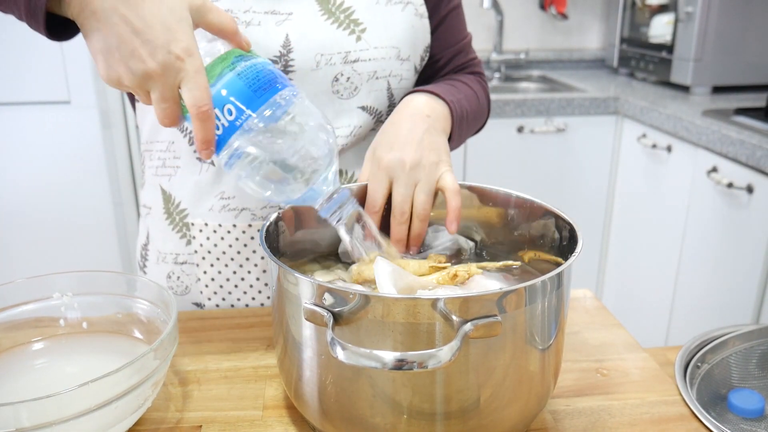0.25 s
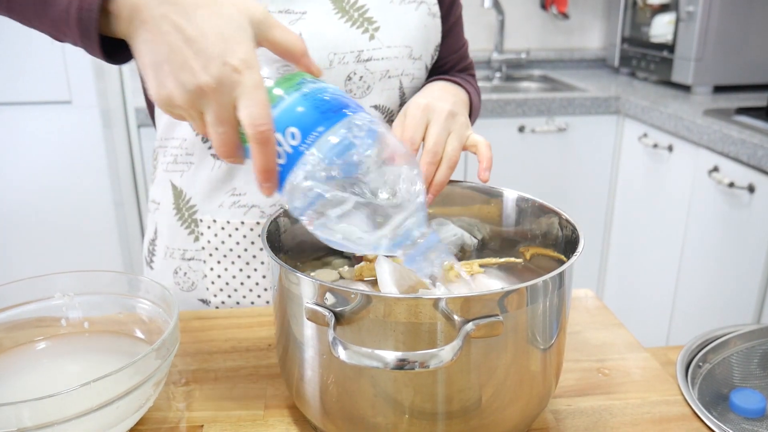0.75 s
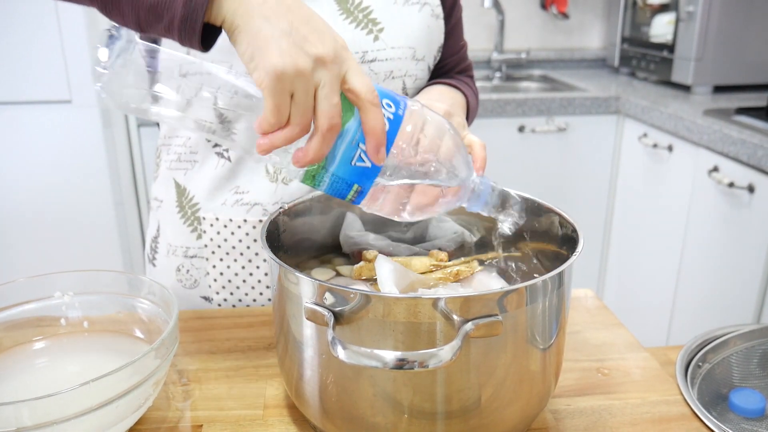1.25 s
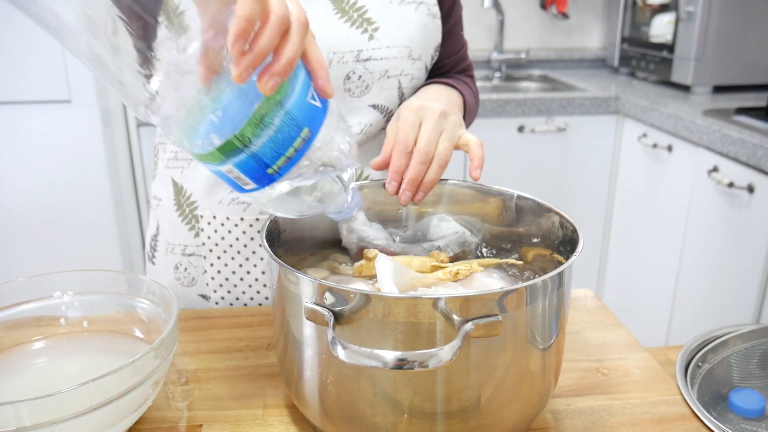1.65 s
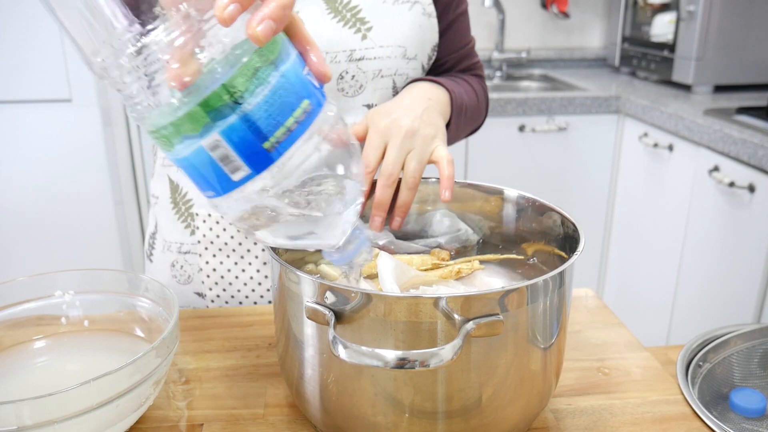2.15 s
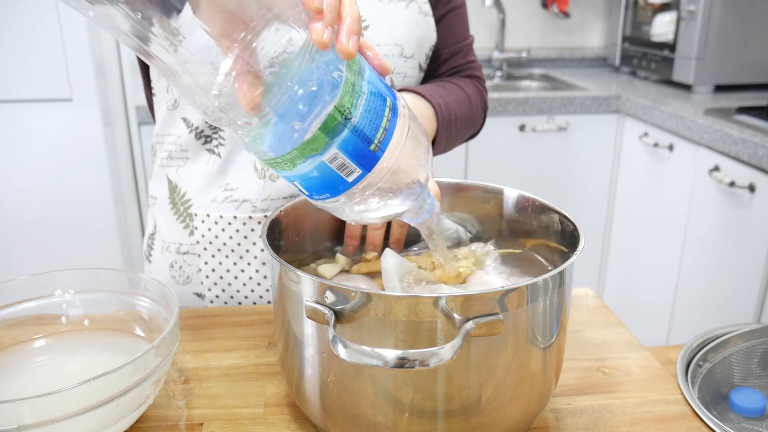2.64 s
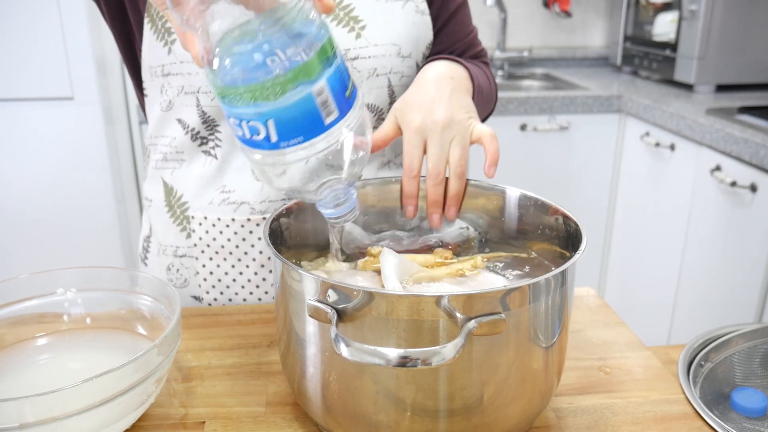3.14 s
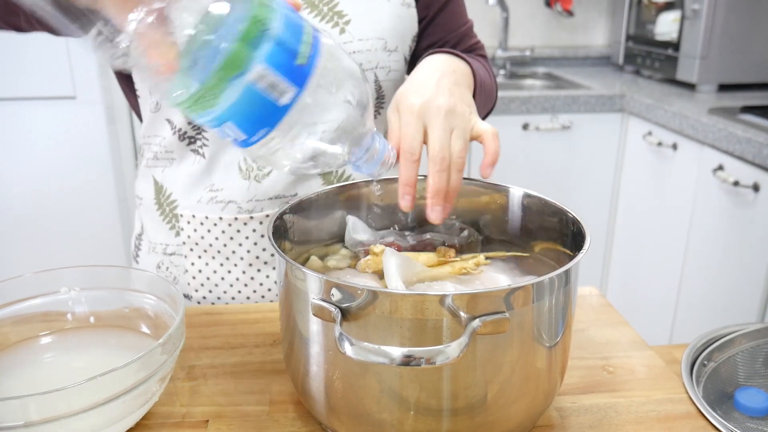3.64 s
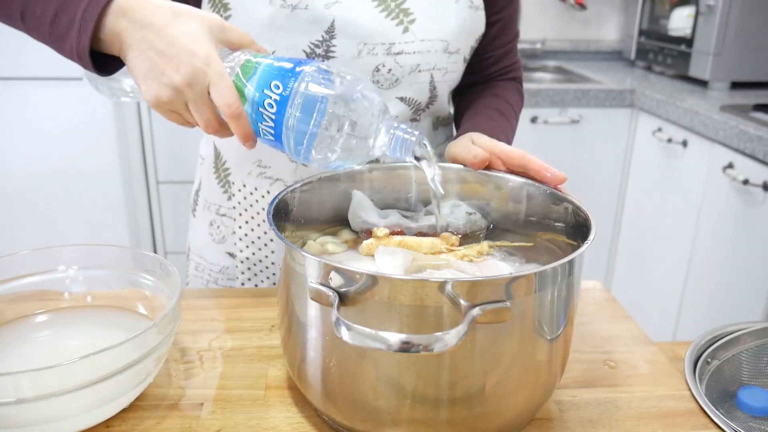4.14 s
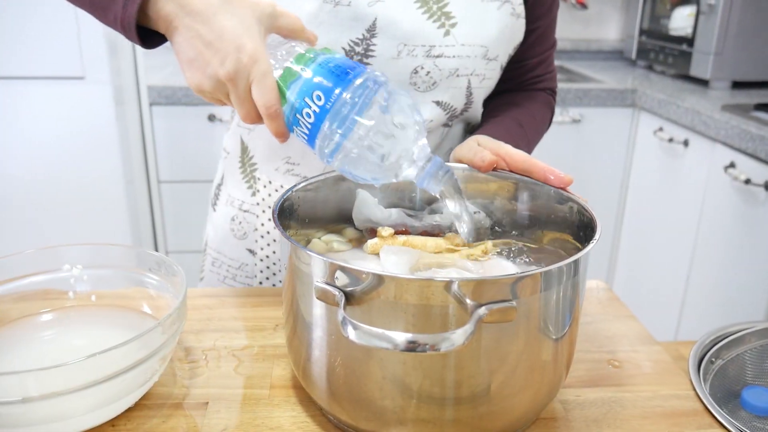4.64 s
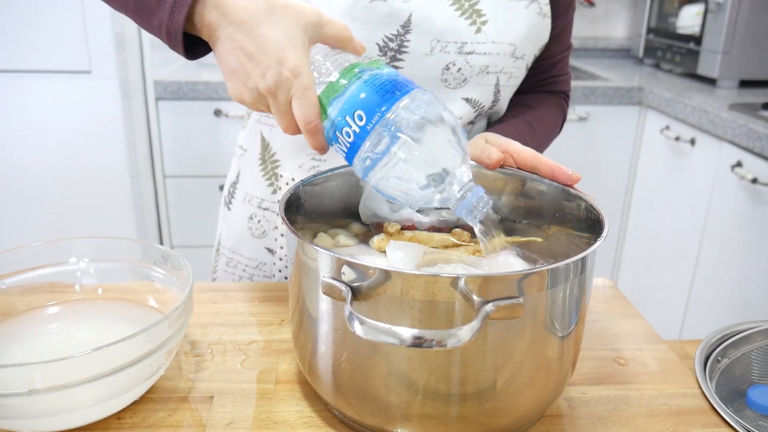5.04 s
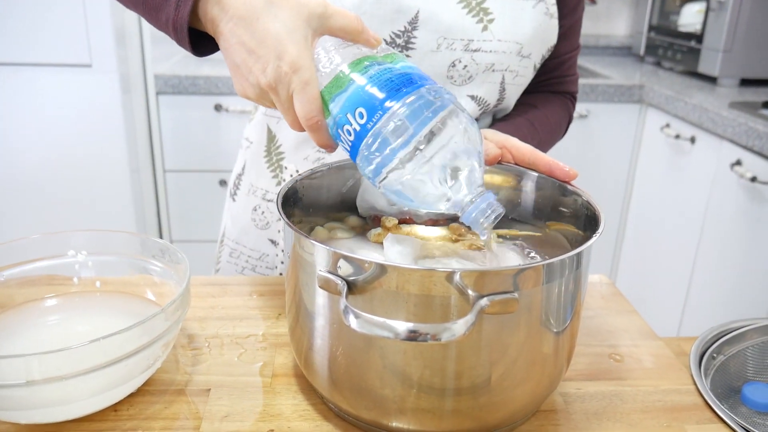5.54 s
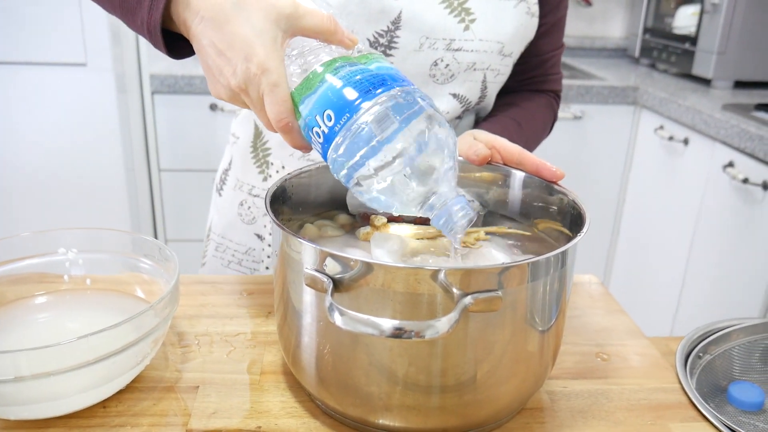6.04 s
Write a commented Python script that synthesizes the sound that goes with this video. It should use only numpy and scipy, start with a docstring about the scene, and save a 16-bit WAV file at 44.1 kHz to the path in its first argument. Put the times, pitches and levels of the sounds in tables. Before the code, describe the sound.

A close, nearly mono pour in a small reflective kitchen over a very quiet low hum. From 0 to 1.1 seconds, a thin uneven trickle spatters onto food in a steel pot, with soft even gulps at about 0.26, 0.54, 0.78 and 1.03, each singing upward. From 1.25 the glugs deepen, strongest near 1.5, 1.8 and 2.1, with crisp splashes, ticking drops and clear ringing bubbles. At 2.3 the bottle's plastic wall snaps back in a loud, hollow pop. The flow thins into plinks, small slaps and a quick upward chirp near 2.8; a mesh bag squishes brightly at 3.15 and 3.92. Sound vanishes completely from 4.05 to 4.4. A second pour then starts, its glugs drooping in pitch, growing denser and splashier after 5.2, with a hollow slap near 5.76 and bubbling glugs until the end.

```python
"""Water is poured in spurts from a big plastic bottle onto food in a steel pot, in a small kitchen.
Soft, even gulps open the pour, each with a rising note; stronger glugs follow as air enters the neck.
The stream spatters and traps ringing bubbles; near 2.3 s the bottle's wall pops back loudly, and
a mesh bag squishes near 3.15 and 3.92 s. After a brief mute near 4.2 s a second pour glugs and splashes,
with one hollow slap near 5.76 s. Tones are damped rings, splashes noise, the stream a swarm of rings."""
import sys
import numpy as np
from scipy import signal
from scipy.fft import rfft, irfft, next_fast_len
from scipy.io import wavfile
from scipy.ndimage import uniform_filter1d, map_coordinates

SR = 44100
rng = np.random.default_rng(int(sys.argv[2]) if len(sys.argv) > 2 else 0)


def master_out(mix):
    """Clip the mix to full scale and print it as 16-bit PCM to the path in sys.argv[1]."""
    frames = np.transpose(np.atleast_2d(mix))
    ceiling = np.clip(frames, -1, 1)
    pcm = np.round(ceiling * 32767).astype(np.int16)
    wavfile.write(sys.argv[1], SR, pcm)


N = 277462

# Spectrum of the kitchen background. Each row: frequency in Hz, relative density in dB.
HUM_SPECTRUM = [(12, -46), (20, 8), (60, -12.5), (168, -2), (234, -7.5), (337, -9.5), (367, -10.5),
                (446, -14), (558, -10.5), (607, -13.5), (1000, -15.5), (1400, -20.5), (2460, -35),
                (16000, -38.5)]
HUM_RMS_DB = -55
# Decay of the kitchen's reverberation. Each row: frequency in Hz, t60 in seconds.
ROOM_DECAY = [(80, 0.57), (200, 0.47), (400, 0.56), (1500, 0.37), (5000, .4), (9000, 0.46), (14000, 0.047)]
# Early reflections off pot wall, table and cook. Each row: nominal delay in seconds, linear gain.
EARLY_ECHOES = [(.0021, 0.25), (.0053, 0.087), (.0094, 0.19), (0.0123, 0.19)]
# The kitchen's low modes. Each row: centre in Hz, width in Hz, gain in dB.
ROOM_MODES = [(153, 9.7, 0), (238, 8.3, -3), (376, 86, -4.5)]
# Difference signal of the two microphone ports. Each row: frequency in Hz, side level in dB.
STEREO_SIDE = [(30, -18.5), (120, -35.5), (1000, -28.5), (2500, -27.5), (5000, -18), (12000, -15)]
# The muted moment between two pours: start in seconds, end in seconds.
MUTE_SPAN = (4.046, 4.408)
CEILING, TOP_HZ = 1.0, 16000  # soft clipping limit at full scale; upper band edge
LOW_CUT_HZ = 77  # the narrow neck radiates little below this

# Thin stream between the spurts. Each row: time in seconds, relative level in dB.
TRICKLE = [(0.0, -55.5), (1.15, -58.5), (1.45, -51), (1.76, -62.5), (2.5, -59.5), (3.0, -58.5), (3.5, -62),
           (3.8, -72), (4.5, -60.5), (4.95, -61), (5.3, -51.5), (5.62, -58), (6.1, -53.5)]
TRICKLE_SPRAY_DB = -4.5  # spray against bubbling
DRIBBLE_DB, DRIBBLE_KNOTS_PER_S = 4, 35  # the thin stream comes in uneven dribbles
# Spurts of water landing in the pot, and the hiss of a squeezed mesh bag near 3.15 and 3.92 s.
# Each row: start in seconds, relative bubbling level in dB, length in seconds, spray over bubbling in dB.
SPURTS_AND_SQUISHES = [(0.0, -50.5, 0.088, 4), (0.331, -53.5, 0.042, 3), (0.417, -53.5, 0.043, 2.5),
                       (0.606, -43.5, 0.023, -7.5), (0.655, -56.5, 0.027, 11.5), (0.84, -49, .06, -2),
                       (0.923, -40.5, 0.031, -7), (1.186, -39.5, 0.0244, -3.5), (1.258, -39.5, .015, -12.5),
                       (1.482, -25.5, 0.0083, -12), (1.551, -34.5, 0.017, -4.5),
                       (1.807, -48.5, 0.0056, 10.5), (1.867, -41, 0.01, -4.5), (1.953, -41, 0.022, -11.5),
                       (2.11, -49, 0.39, -3.5), (2.442, -42, 0.014, -4), (2.628, -46.5, 0.043, -3.5),
                       (2.734, -44.5, 0.067, -1.5), (2.814, -40, 0.0089, -1), (3.067, -57, 0.012, 5),
                       (3.154, -54.5, 0.02, 8.5), (3.268, -44.5, 0.025, -23), (3.913, -43.5, 0.021, -7.5),
                       (4.521, -53, .07, 4.5), (4.765, -49.5, 0.012, 0.5), (5.025, -40.5, 0.0093, -7),
                       (5.133, -47, 0.0092, -4), (5.242, -38.5, 0.019, -9.5), (5.348, -34.5, 0.017, -4),
                       (5.43, -46, 0.0253, -6), (5.524, -42, 0.0074, -13.5), (5.695, -46, 0.15, -8),
                       (5.758, -38, 0.016, 1), (5.804, -35.5, 0.012, -24.5), (5.956, -44.5, 0.016, -12.5),
                       (6.155, -37.5, 0.018, -14.5), (6.211, -41, 0.026, -8.5), (6.269, -35, 0.017, -20)]
SPURT_ATTACK_S, SPURT_FALL_DB_PER_S = 0.0033, 212
# Colour of the bubbling. Each row: frequency in Hz, gain in dB.
GURGLE_COLOUR = [(500, -24.5), (800, -11), (1200, -3.5), (2500, 1), (3600, 0), (5000, -4.5), (8000, -26)]
# Colour of the spray and of each tick's crack. Each row: frequency in Hz, gain in dB.
SPRAY_COLOUR = [(1500, -5), (3000, -8), (5000, -1), (8000, 3.5), (10700, -6.5), (12800, 0.5),
                (15500, -10.5)]
BUBBLING_DB, SPRAY_DB = -2.5, 0  # layer gains
PLINK_DB, MIST_DB = -4.5, -3.5  # clear single bubbles against the bubbling; mist against the crackle
CLUMP_DB = 5  # lumpiness of the stream

# Sharp drops ticking on food and steel, and two bright squishes of a mesh bag near 3.15 and 3.92 s.
# Each row: start in seconds, relative level in dB, pitch in Hz.
TICKS_AND_SQUISHES = [(0.036, -42, 6300), (.249, -30, 8750), (0.3389, -27, 7300), (0.445, -31, 8550),
                      (1.035, -28.5, 5900), (1.4746, -19, 6500), (1.499, -19, 3830), (1.561, -17.5, 7840),
                      (1.8158, -21, 8160), (2.4635, -26.5, 7600), (2.7356, -30.5, 4700),
                      (2.8268, -28, 7600), (2.9585, -31, 7600), (3.0784, -33, 10300), (3.153, -20, 12100),
                      (3.5496, -35, 6180), (3.923, -23.5, 13700), (4.5863, -27.5, 5300),
                      (5.3779, -20, 7800), (5.5003, -23.5, 5470), (5.774, -29, 7300), (5.824, -21.5, 9800)]
TICK_CYCLES = 26  # cycles of ringing per t60
# Lumps of water slapping down. Each row: start in seconds, relative level in dB, t60 in seconds.
SLAPS = [(.022, -25.5, 0.016), (0.447, -27.5, .016), (1.196, -30, 0.19), (1.499, -27.5, .02),
         (1.527, -37.5, .022), (2.818, -37, 0.01), (3.274, -37.5, .008), (3.46, -26.5, 0.022),
         (4.412, -34, 0.148), (5.244, -34.5, 0.0293), (5.368, -27, 0.077), (5.689, -21, 0.023),
         (5.763, -23, 0.17), (5.773, -21, .11), (6.16, -17, 0.011), (6.269, -28, 0.027)]
# Colour of the slaps. Each row: frequency in Hz, gain in dB.
SLAP_COLOUR = [(100, -12), (400, -4.5), (800, 8), (2500, -6.5), (5000, -14), (9000, -20.5), (16000, -25.5)]
# Air pockets closing as they surface.
# Each row: start in seconds, level in dB, first pitch in Hz, last pitch in Hz, length in seconds.
CHIRPS = [(2.778, -23.5, 2845, 4180, 0.012), (5.121, -39.5, 964, 2120, 0.037),
          (5.338, -25.5, 1420, 2460, .018), (5.954, -31.5, 1800, 2730, 0.017)]
CHIRP_BEND = 1.5  # the climb speeds up toward the end
# The largest bubbles. Each row: start in seconds, relative level in dB, pitch in Hz, t60 in seconds.
BUBBLES = [(0.3516, -26.5, 3580, 0.016), (0.4457, -24, 2130, 0.0041), (0.6973, -30, 3100, 0.018),
           (0.937, -32, 1140, 0.025), (0.9506, -23, 2680, 0.017), (1.221, -32, 744, 0.12),
           (1.4054, -33.5, 976, 0.028), (1.4467, -15.5, 2356, 0.02), (1.5774, -27.5, 1130, 0.046),
           (1.7053, -27, 1496, .036), (1.9759, -26, 1720, 0.012), (2.014, -33, 2536, .021),
           (2.762, -31, 1600, 0.049), (2.818, -28, 1350, 0.016), (2.88, -37, 1740, 0.02),
           (3.123, -35, 2700, 0.016), (3.197, -29, 2530, 0.011), (3.367, -26, 2020, 0.0063),
           (3.5152, -40.5, 2840, .024), (4.586, -24.5, 2510, 0.0078), (5.255, -27.5, 2600, 0.048),
           (5.525, -27, 2150, 0.019), (5.726, -16.5, 1340, 0.0045), (5.7848, -21.5, 2484, 0.032),
           (5.984, -24, 1141, 0.43), (6.057, -28, 1650, .07), (6.222, -24.5, 2210, 0.012),
           (6.2694, -29.5, 810, 0.059)]
BUBBLE_RISE, BUBBLE_LIFE_S = 0.12, 0.013  # climb in pitch per t60, as a share; time until it bursts

# The plastic wall popping. Each row: start in seconds, relative level in dB, t60 in seconds.
POPS = [(2.2892, 2, 0.029)]
# Resonances of the bottle and its water. Each row: centre in Hz, width in Hz, gain in dB.
WALL_MODES = [(131.1, 110, -3.5), (350, 120, 4), (695, 420, -4), (1100, 197, 4), (1660, 700, -8.5),
              (2700, 790, -11.5), (5400, 1800, -24.5), (13000, 2700, -38)]
# Soft, even gulps as the pour begins. Each row: start in seconds, relative level in dB.
GULPS = [(0.2608, -27.5), (0.5354, -25.5), (0.7768, -27), (1.034, -30)]
GULP_HZ, GULP_UPPER_DB = 305, -16  # pitch; relative level of the upper resonance
NOTE_HZ, NOTE_T60_S, NOTE_RISE, NOTE_DB = 264.6, 0.14, 1.2, -3  # rising note after each soft gulp
NOTE_DELAY_S, NOTE_ATTACK_S = 0.004, 0.006
# Air gulping in at the neck, and one hollow slap of water near 5.76 s.
# Each row: start in seconds, relative level in dB, pitch in Hz, glide as a share of the pitch,
# upper resonance in relative dB.
GLUGS_AND_HOLLOW_SLAP = [(1.2609, -26.5, 165.6, 0.5, -12), (1.347, -26, 232, 0.3, -25),
                         (1.4017, -27.5, 232, 0.2, -35), (1.5036, -11, 247, -0.14, -6),
                         (1.675, -27.5, 228, -0.2, -33), (1.8128, -9.5, 434, -.1, -6),
                         (1.981, -26, 206, 0, -32), (2.1138, -7, 428, 0.26, -6.5),
                         (2.389, -24.5, 156, -0.06, -37), (4.4137, -23, 340, -0.5, -26),
                         (4.6595, -25.5, 333, -0.63, -6.5), (4.9933, -25.5, 333, -0.9, -4.5),
                         (5.224, -31, 328, -0.5, -3), (5.2457, -26, 350, -1.2, 4),
                         (5.3653, -23.5, 323, -.4, -38), (5.6643, -25, 341, -0.54, -13),
                         (5.6903, -23.5, 345, -0.8, -18), (5.763, -17, 680, 0.2, 2.5),
                         (5.8499, -29, 320, -1, -1), (6.1346, -20.5, 370, -0.75, -5)]


def amp(db):
    """Logarithmic level: decibels to amplitude gain."""
    return 10 ** (np.asarray(db) / 20)


def unit(x):
    """Normalisation of power: scale to rms 1."""
    return x / np.sqrt(np.mean(x ** 2) + 1e-20)


def levelled(x, span_s):
    """Short-time power normalisation: hold the rms near 1 over stretches of span_s."""
    power = np.abs(uniform_filter1d(x ** 2, int(span_s * SR)))
    return x / np.sqrt(power + 1e-12)


def along(points, hz):
    """Interpolation of (Hz, value) points on a logarithmic frequency axis."""
    f, v = np.transpose(points)
    return np.interp(np.log(hz + 1), np.log(f), v)


def filtered(x, response):
    """Linear filtering: multiply the spectrum by a function of frequency."""
    n = x.shape[-1]
    m = next_fast_len(n + SR // 4)
    return irfft(rfft(x, m) * response(np.fft.rfftfreq(m, 1 / SR)), m)[..., :n]


def coloured(x, points, size=2048):
    """Minimum-phase filtering: fold the cepstrum of (Hz, dB) gains into a causal response."""
    cepstrum = irfft(np.log(amp(along(points, np.fft.rfftfreq(size, 1 / SR)))))
    cepstrum[1:size // 2] *= 2
    cepstrum[size // 2 + 1:] = 0
    impulse = irfft(np.exp(rfft(cepstrum)))
    return signal.fftconvolve(x, impulse)[:len(x)]


def resonant(x, modes):
    """Modal superposition: parallel damped resonators with alternating signs."""
    def response(f):
        total = 0
        for k, (centre, width, db) in enumerate(modes):
            mode = 1j * f * width / (centre * centre - f * f + 1j * f * width)
            total = total + (-1) ** k * amp(db) * mode
        return total
    return filtered(x, response)


def add(track, s, sound):
    """Superposition: mix a sound into the track at time s."""
    part = track[max(round(s * SR), 0):][:len(sound)]
    part += sound[:len(part)]


def wobble(rate):
    """Smooth random modulation: a spline through rate random knots a second."""
    knots = rng.standard_normal(int(N * rate / SR) + 4)
    return map_coordinates(knots, [np.arange(N) * rate / SR])


def ring(hz, t60, rise, attack):
    """Damped oscillation: a decaying tone whose pitch changes by the share rise in one t60."""
    t = np.arange(int(t60 * SR) + 2) / SR
    tone = np.sin(2 * np.pi * hz * t * (1 + rise * t / t60 / 2))
    return tone * amp(-60 * t / t60) * (1 - np.exp(-t / attack))


def burst(t60):
    """Exponential decay of noise: a puff of white noise dying away."""
    t = np.arange(SR // 4) / SR
    return rng.standard_normal(len(t)) * amp(-60 * t / t60)


def swarm(count, low_hz, high_hz, cycles, rise, spread_db):
    """Random superposition: many bubbles or drops of random time, pitch, life and size."""
    track = np.zeros(N)
    for when, pitch, life, size in rng.random((count, 4)):
        hz = low_hz * (high_hz / low_hz) ** pitch
        t60 = cycles * 2 ** (2 * life - 1) / hz  # half to double the given cycles
        tone = ring(hz, t60, rise, 0.5 / hz)
        add(track, when * N / SR, amp(spread_db * size ** 2) * tone)
    return track


def hum():
    """Stationary noise: the kitchen background is white noise shaped to a steady spectrum."""
    return amp(HUM_RMS_DB) * unit(coloured(rng.standard_normal(N), HUM_SPECTRUM, size=16384))


def kitchen(x, wet_db):
    """Reverberation: close hard surfaces answer first, then noise decays at each frequency's own rate."""
    hz, t, z = signal.stft(rng.standard_normal(SR // 2), SR, nperseg=256)
    decay = amp(-60 * t / along(ROOM_DECAY, hz)[:, None])
    tail = signal.istft(z * decay, SR, nperseg=256)[1]
    tail *= 1 - np.exp(-np.arange(len(tail)) / SR / 0.00067)
    answer = amp(wet_db) * tail / np.linalg.norm(tail)
    for delay, gain in EARLY_ECHOES:
        add(answer, delay * np.exp(rng.normal(0, 0.16)), np.array([gain]))
    return x + signal.fftconvolve(x, answer)[:len(x)]


def moving(x, wet_db, count=18):
    """Time-varying reflection: the stream wanders over the pot, so each stretch has fresh echoes."""
    track = np.zeros(N)
    for part in np.array_split(np.arange(N), count):
        padded = np.pad(x[part], (0, SR // 2))  # room for the tail
        add(track, part[0] / SR, kitchen(padded, wet_db))
    return track


def flow():
    """Addition of powers: each spurt or squish swells, holds and fades over a thin, dribbling stream."""
    t = np.arange(N) / SR
    trickle_db = np.interp(t, *np.transpose(TRICKLE))
    bubbling = amp(trickle_db + DRIBBLE_DB * wobble(DRIBBLE_KNOTS_PER_S)) ** 2
    spray = bubbling * amp(TRICKLE_SPRAY_DB) ** 2
    for s, db, length, spray_db in SPURTS_AND_SQUISHES:
        swell = np.clip((t - s) / SPURT_ATTACK_S + 0.5, 0, 1)
        gain = swell * amp(db - SPURT_FALL_DB_PER_S * np.maximum(t - s - length, 0))
        bubbling = bubbling + gain ** 2
        spray = spray + (gain * amp(spray_db)) ** 2
    return np.sqrt(bubbling), np.sqrt(spray)


def stream_and_squishes():
    """Bubble entrainment and spray: foam, clearer plinks and drops, which also lend the bag its hiss."""
    foam = swarm(count=6000, low_hz=600, high_hz=5000, cycles=11, rise=0.1, spread_db=20)
    plinks = swarm(count=230, low_hz=1100, high_hz=5000, cycles=46, rise=0.3, spread_db=12)
    crackle = swarm(count=7000, low_hz=2800, high_hz=15000, cycles=6, rise=0.05, spread_db=30)
    drops = swarm(count=1300, low_hz=3000, high_hz=14000, cycles=50, rise=0.14, spread_db=26)
    mist = amp(MIST_DB) * rng.standard_normal(N)  # droplets too fine to tell apart
    # the stream breaks into blobs before it lands
    clumps = amp(CLUMP_DB * wobble(55) + 2.06 * wobble(300))
    gurgle = levelled(coloured(clumps * foam, GURGLE_COLOUR), 0.045)
    gurgle = gurgle + amp(PLINK_DB) * unit(coloured(plinks, GURGLE_COLOUR))
    droplets = unit(crackle) + amp(1) * unit(drops) + mist
    spray = levelled(coloured(clumps * droplets, SPRAY_COLOUR), 0.06)
    bubbling_gain, spray_gain = flow()
    return amp(BUBBLING_DB) * bubbling_gain * gurgle + amp(SPRAY_DB) * spray_gain * spray


def ticks_and_squishes():
    """Short excitation: a drop, or the squished mesh bag, gives a tiny crack and a very short ping."""
    track = np.zeros(N)
    for s, db, hz in TICKS_AND_SQUISHES:
        add(track, s, amp(db + 5.5) * ring(hz, TICK_CYCLES / hz, 0.17, 0.0001))
        add(track, s, amp(db - 7) * coloured(burst(0.0118), SPRAY_COLOUR))
    return track


def slaps():
    """Broadband impact: a lump of water breaks on the food in a splash of decaying noise."""
    track = np.zeros(N)
    for s, db, t60 in SLAPS:
        add(track, s, amp(db + 1) * burst(t60))
    return coloured(track, SLAP_COLOUR)


def chirps():
    """Resonance of a shrinking cavity: an air pocket swells and whoops upward as it closes."""
    track = np.zeros(N)
    for s, db, first_hz, last_hz, length in CHIRPS:
        u = np.linspace(0, 1, int(length * SR))
        hz = first_hz * (last_hz / first_hz) ** (u ** CHIRP_BEND)
        swell = np.abs(np.sin(np.pi * u))
        add(track, s, amp(db) * swell * np.sin(2 * np.pi * np.cumsum(hz) / SR))
    return track


def bubbles():
    """Bubble resonance: trapped air pinches off with a click and rings until it bursts at the surface."""
    track = np.zeros(N)
    for s, db, hz, t60 in BUBBLES:
        tone = ring(hz, t60, BUBBLE_RISE, 0.00011)
        alive = 1 / (1 + (np.arange(len(tone)) / SR / BUBBLE_LIFE_S) ** 8)
        add(track, s, amp(db + 2.5) * tone * alive)
        add(track, s, amp(db - 14) * ring(hz, 0.003, 0, 0.0001))  # click
    return track


def pops():
    """Impulse response of a shell: the sucked-in wall snaps back, a push and a rattle through its modes."""
    track = np.zeros(N)
    for s, db, t60 in POPS:
        add(track, s, amp(db + 25) * np.ones(1))  # push
        add(track, s, amp(db + 4.5) * burst(t60))  # rattle
    return resonant(track, WALL_MODES)


def hollow_ring(db, hz, glide, upper_db):
    """Superposed resonances: a main tone of a few cycles, a low push and an upper tone near 670 Hz."""
    sound = np.zeros(SR // 10)
    add(sound, 0, amp(db - 0.5) * ring(hz, 8 / hz, glide, 0.0016))
    add(sound, 0, amp(db + 2.0) * ring(249, 0.014, 0, 0.00048))
    add(sound, 0.001, amp(db + upper_db + 9.5) * ring(670, 0.015, 0.11, 0.003))
    return sound


def glugs_and_hollow_slap():
    """Cavity resonance: air gulps in at the neck, soft gulps sing upward, and one slap rings hollow."""
    track = np.zeros(N)
    for s, db in GULPS:
        add(track, s - 0.001, hollow_ring(db, GULP_HZ, 0, GULP_UPPER_DB))
        # the bubble sings upward as it rises
        note = ring(NOTE_HZ, NOTE_T60_S, NOTE_RISE, NOTE_ATTACK_S)
        add(track, s + NOTE_DELAY_S, amp(db + NOTE_DB) * note)
    for s, db, hz, glide, upper_db in GLUGS_AND_HOLLOW_SLAP:
        add(track, s - 0.001, hollow_ring(db, hz, glide, upper_db))
    return track


def scene():
    """Superposition of sources: bottle, pot and mesh bag in the kitchen, heard almost in mono."""
    hollow = glugs_and_hollow_slap() + pops()
    # the narrow neck radiates little bass
    hollow = filtered(hollow, lambda hz: (1j * hz / (LOW_CUT_HZ + 1j * hz)) ** 2)
    hollow_in_room = moving(hollow, wet_db=-10.5)
    # the low modes build up once the walls have answered
    add(hollow_in_room, 0.016, resonant(hollow, ROOM_MODES))
    splashes = bubbles() + chirps() + ticks_and_squishes() + slaps() + stream_and_squishes()
    splashes_in_room = moving(splashes, wet_db=-13.5)
    mid = hollow_in_room + splashes_in_room + hum()
    # the two microphone ports hear slightly different reflections
    scatter = np.pad(burst(0.04), (SR // 500, 0))
    scattered = signal.fftconvolve(mid, scatter / np.linalg.norm(scatter))[:N]
    side = filtered(scattered, lambda hz: amp(along(STEREO_SIDE, hz)))
    return np.array([mid + side, mid - side])


def record(dry):
    """Saturation and band limiting: soft clipping, a mute between the pours, then a low-pass."""
    t = np.arange(N) / SR
    live = (t < MUTE_SPAN[0]) | (t > MUTE_SPAN[1])
    clipped = dry / (1 + (dry / CEILING) ** 4) ** (1 / 4)
    return filtered(clipped * live, lambda hz: hz < TOP_HZ)


dry = scene()
out = record(dry)
master_out(out)
```